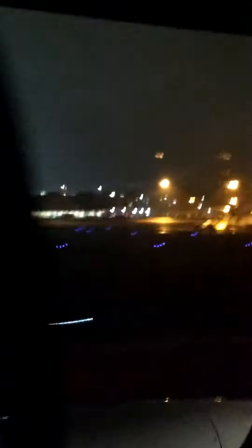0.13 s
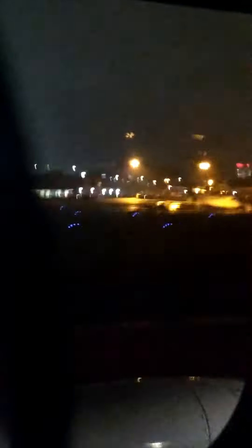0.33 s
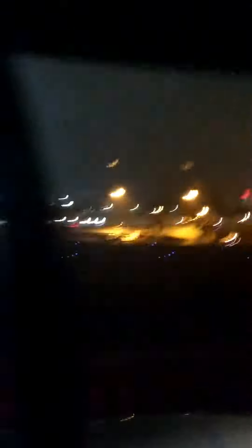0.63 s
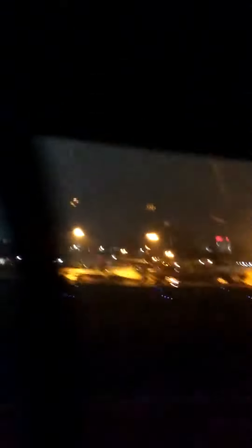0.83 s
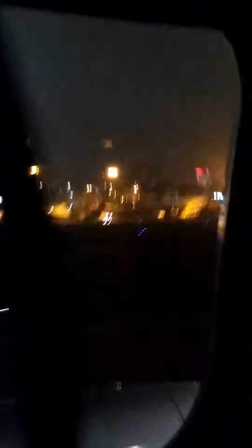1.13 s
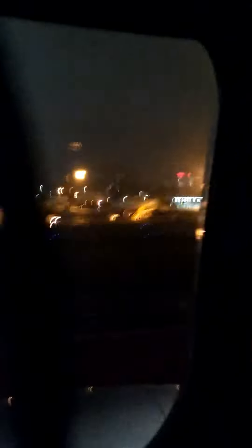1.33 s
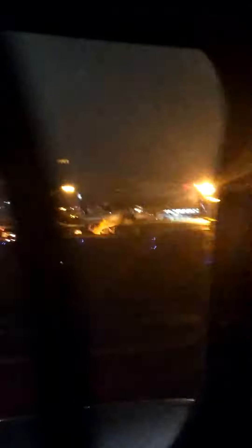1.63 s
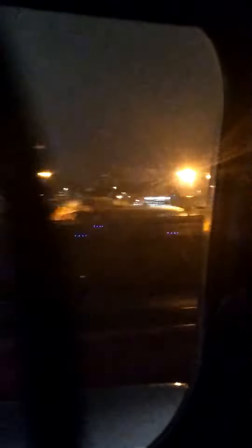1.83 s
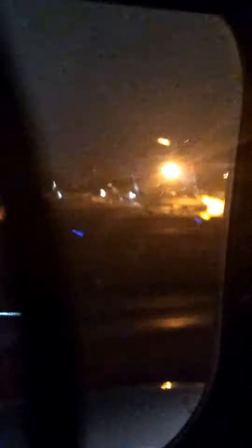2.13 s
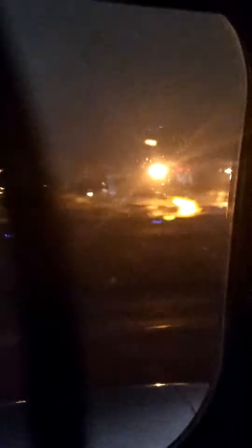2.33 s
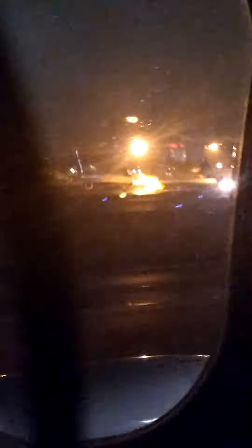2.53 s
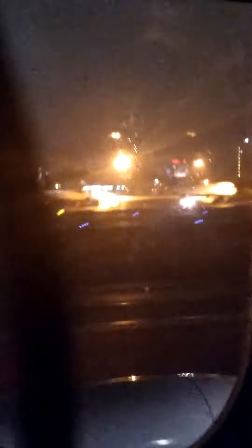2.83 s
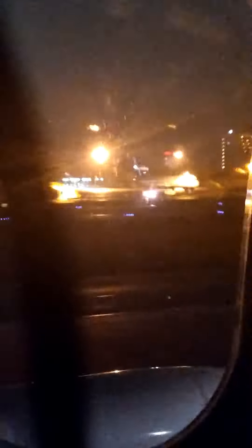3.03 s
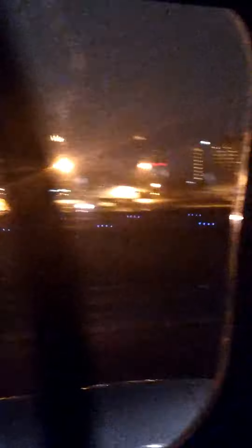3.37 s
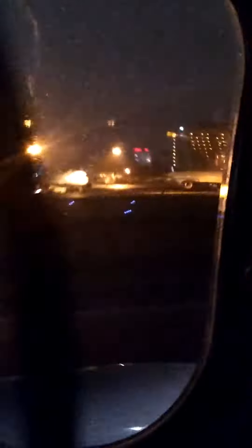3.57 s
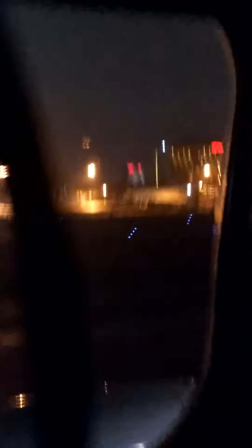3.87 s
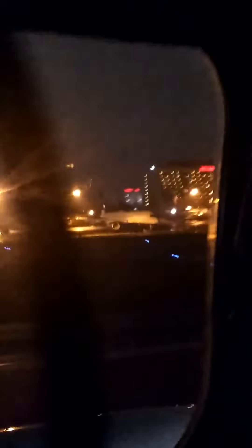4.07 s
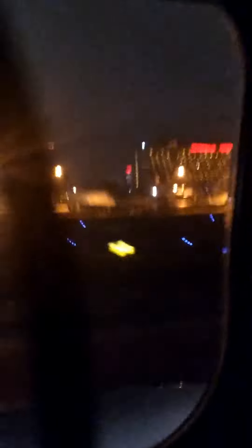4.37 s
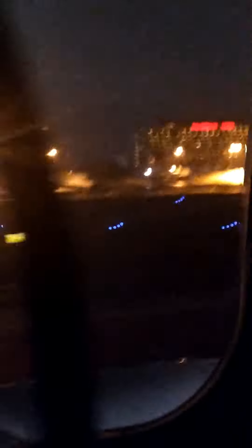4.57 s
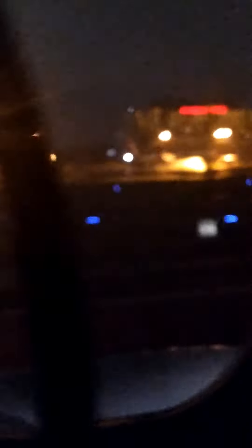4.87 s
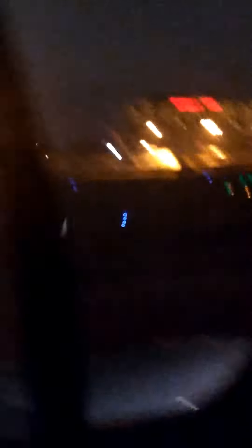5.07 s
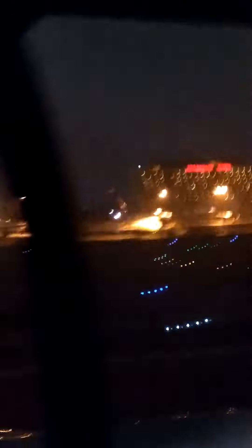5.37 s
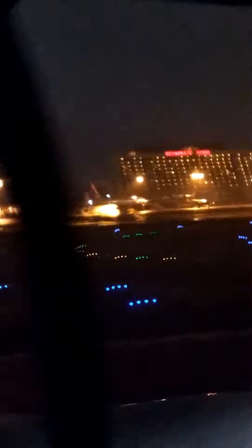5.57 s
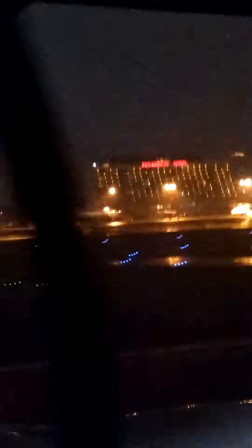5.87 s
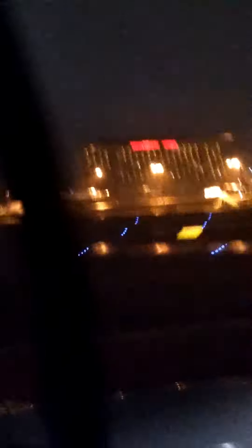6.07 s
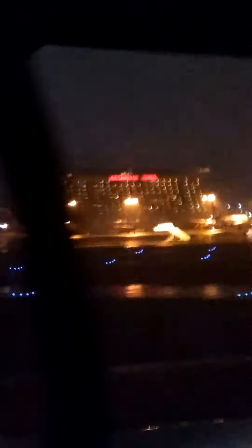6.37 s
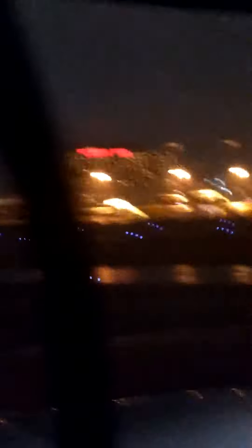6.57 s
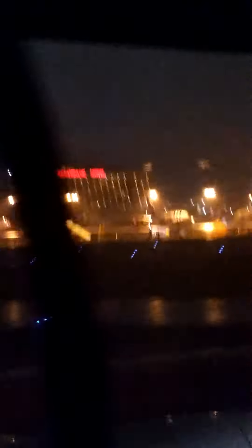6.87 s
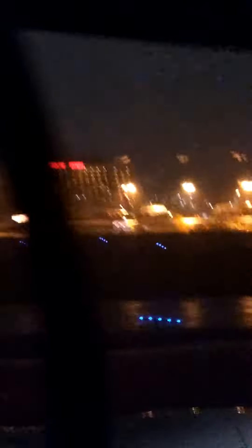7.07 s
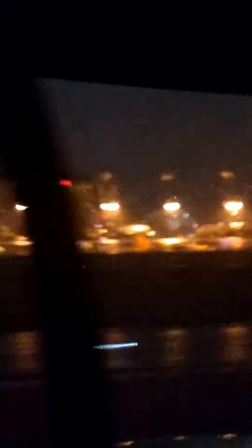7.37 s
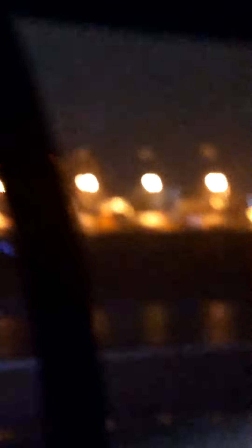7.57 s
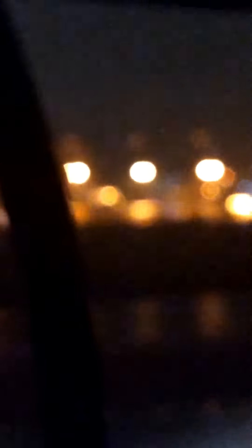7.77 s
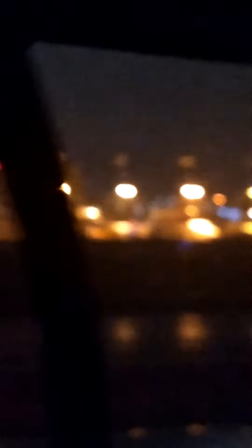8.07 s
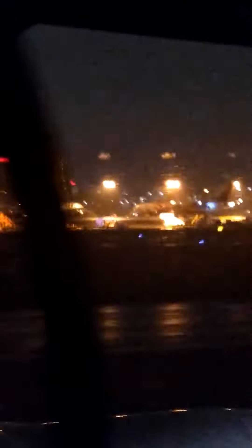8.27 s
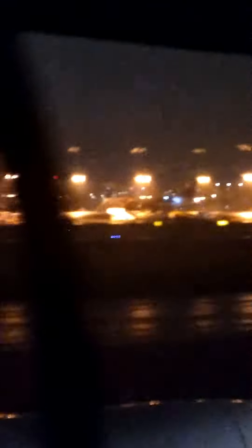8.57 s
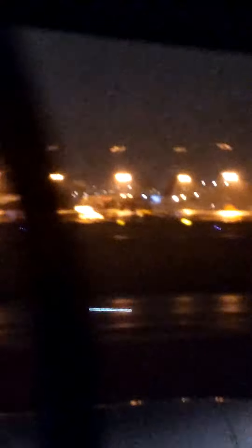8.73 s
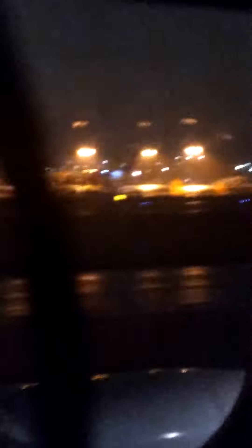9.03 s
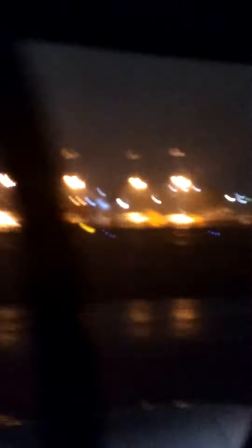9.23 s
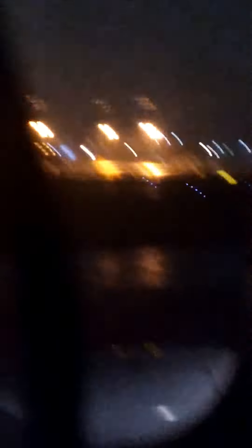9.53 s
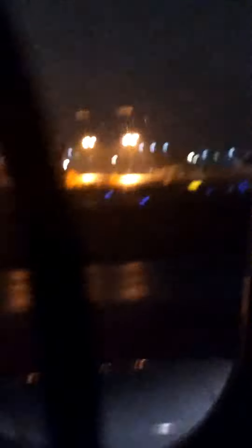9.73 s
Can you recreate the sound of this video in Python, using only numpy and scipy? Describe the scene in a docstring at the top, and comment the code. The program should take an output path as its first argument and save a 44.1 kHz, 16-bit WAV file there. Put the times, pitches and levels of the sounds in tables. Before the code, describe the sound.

From a window seat in an airliner cabin just after landing, low wheel rumble builds while the engines spool up with a faint rising whine. Around one to two seconds hard braking makes an even, booming judder, then a sharp rattle. Irregular deep thumps continue to about five seconds, then the rumble slowly eases under steady roar and soft seam thuds. The close handheld stereo microphone picks up heavy bass and thin hiss.

```python
"""In an airliner cabin, at a window seat, the roll-out after landing is heard.
Wheel rumble, shell drone and jolts are shaped noise; engine roar and reverser blast are turbulent noise.
Gliding sines make the fan whine and a thin whistle, filtered noise hisses from the vents,
and bursts of tiny contacts ring the loose fittings through their modes.
Now and then the roar, hiss, whines and ticking dip together briefly."""
import sys
import numpy as np
from scipy import signal
from scipy.fft import rfft, irfft
from scipy.io import wavfile
from scipy.ndimage import uniform_filter1d

SR = 44100
rng = np.random.default_rng(int(sys.argv[2]) if len(sys.argv) > 2 else 0)


def materialize(psi):
    """Save the field psi as 16-bit PCM at rate SR to the path in sys.argv[1].

    A 1-D psi becomes a single channel; in a 2-D psi each row is a channel.
    """
    bounded = np.clip(np.atleast_2d(psi).T, -1, 1)
    quanta = np.round(bounded * 32767).astype(np.int16)
    wavfile.write(sys.argv[1], SR, quanta)


N = 436590
TIME = np.arange(N) / SR
BINS = np.fft.rfftfreq(N, 1 / SR)

# strongest jolts of the fuselage, levels ahead of the panels' band-pass:
# start_s, length_s, level_db, left_over_right_db, pitch_hz, dip_db (brief dip of the other sounds)
JOLTS = [(.054, 0.053, -22, 1, 100, -1.5), (.147, 0.072, -18.5, -3, 80.5, 3),
         (.272, 0.017, -13.5, -2, 75.4, 2), (.519, 0.021, -19, 0, 92, 5), (.576, 0.051, -15.5, -1.5, 91, 2),
         (.88, 0.042, -20.5, 1, 99, 1), (.96, 0.02, -15, -1.5, 107, 3), (1.102, 0.079, -24, 4, 86, 3.5),
         (2.152, 0.098, -13, 6, 106, -1), (2.279, 0.12, -22.5, 4, 83, 7), (2.72, 0.13, -25, 9, 81, 4.5),
         (2.875, 0.077, -19.5, -2.5, 91, 5), (3.193, 0.066, -23.5, 1, 94, 8),
         (3.331, 0.034, -14.5, 8, 112, 7), (3.59, 0.045, -18, 13, 109, 3.5), (3.801, 0.15, -18, 1.5, 97, 3),
         (4.109, .14, -10.5, 2, 88, 11), (4.283, .036, -19.5, 2, 104, -3), (4.372, .11, -16.5, -2.5, 99, 7),
         (4.64, 0.061, -22.5, -1, 111, 8.5), (4.711, .1, -13.5, 4, 96, 7),
         (4.829, 0.061, -20.5, 4, 124, -2), (4.969, .052, -22, 1, 105, 0), (5.086, .045, -11, 0.5, 96, 7),
         (5.835, 0.046, -16.5, 0, 82, 7), (5.921, 0.13, -25.5, -3, 85.4, 2),
         (7.312, 0.035, -23.5, -2, 108, 15), (7.74, .058, -23.5, -2, 102, 10),
         (9.079, 0.057, -22.5, -4, 112, -2), (9.442, 0.059, -21.5, -4, 80, 8),
         (9.83, 0.045, -25, -1, 73, 8.5)]


def amp(db):
    """Decibels to amplitude ratio: 20 dB per factor of ten."""
    return 10 ** (np.asarray(db) / 20)


def unit(x):
    """Normalization to an rms of 1."""
    return x / np.sqrt(np.mean(x ** 2) + 1e-20)


def spectrum(points, hz):
    """Spectral interpolation of a table, linear along a log-frequency axis."""
    f, value = np.transpose(points)
    return np.interp(np.log(hz + 1e-6), np.log(f), value)


def curve(rows):
    """Linear interpolation in time of each column that follows the first."""
    s, *columns = np.transpose(rows)
    return [np.interp(TIME, s, column) for column in columns]


def add(mix, s, sound):
    """Superposition of a stereo sound on the mix, starting at s seconds."""
    part = mix[:, max(round(s * SR), 0):][:, :sound.shape[1]]
    part += sound[:, :part.shape[1]]


def wander(rate_hz):
    """Low-pass noise of rms 1: random fluctuation that weakens above rate_hz."""
    lowpass = 1 / (1 + (BINS / rate_hz) ** 2) ** 2
    return unit(irfft(rfft(rng.standard_normal(N)) * lowpass, N))


def cabin_noise(colour, pitch=1, size=N):
    """Diffuse-field coherence: both ports hear alike bass and nearly unrelated treble."""
    # likeness of the sound at the two ports: frequency_hz, coherence
    likeness = [(60, 1), (130, 0.86), (290, 0.85), (640, 0.24), (1400, -0.21), (3000, 0.062),
                (16000, -0.01)]
    hz = np.fft.rfftfreq(size, 1 / SR)
    a, b = rfft(rng.standard_normal((2, size)))
    same = np.clip(spectrum(likeness, hz), -1, 1)
    mid = a * np.sqrt(1 + same)
    side = b * np.sqrt(1 - same)
    gain = amp(spectrum(colour, hz / pitch))
    return unit(irfft(np.array([mid + side, mid - side]) * gain, size))


def steadied(x, span_s, evenness):
    """Envelope compression: swings of level are evened over span_s; evenness runs 0-1."""
    power = np.mean(abs(signal.hilbert(x)) ** 2, 0)
    power = uniform_filter1d(power, size=max(int(span_s * SR), 1))
    return unit(x / (abs(power) + 1e-9) ** (min(evenness, 1) / 2))


def patchy(x, patch_db, span_hz, span_s, size=1024):
    """Turbulent modulation: patches of the spectrum swell and sink at random."""
    overlap = size * 3 // 4
    z = signal.stft(x, nperseg=size, noverlap=overlap)[2]
    bins_wide = max(round(span_hz * size / SR), 1)
    frames_long = max(round(span_s * z.shape[2] * SR / N), 1)
    field = rng.standard_normal(z.shape[1:])
    field = uniform_filter1d(field, size=bins_wide, axis=0)
    field = uniform_filter1d(field, size=frames_long, axis=1)
    swollen = z * amp(patch_db * unit(field))
    return unit(signal.istft(swollen, nperseg=size, noverlap=overlap)[1][:, :N])


def slowing(x, sink_per_s=.01):
    """Time-scale warping: pitch sinks by a steady share each second as the aircraft loses speed."""
    place = np.cumsum(1 + sink_per_s * (TIME.mean() - TIME))
    return np.array([np.interp(place, np.arange(N), channel) for channel in x])


def fitting(drive, top_hz=12000, width_hz=80):
    """Modal resonance of a loose fitting under tapping; softer contacts reach less high."""
    # broad ringing of the fittings: frequency_hz, relative_density_db
    ringing = [(1500, -37), (4500, -17), (5600, -3.5), (7500, -2.5), (9000, -0.5), (11000, 1.5),
               (13000, -8), (16000, 5)]
    # sharpest modes of the fittings: frequency_hz, lift_db
    sharp_modes = [(5990, 8), (6300, -5), (7290, 12), (8100, 4), (8765, 8), (8990, 3.5), (9450, -1),
                   (10585, -13), (11490, 4), (12530, -2)]
    hz = np.fft.rfftfreq(drive.shape[1], 1 / SR)
    modes = 1 + sum((amp(db) - 1) / (1 + 2j * (hz - f) / width_hz) for f, db in sharp_modes)
    colour = amp(spectrum(ringing, hz)) / np.sqrt(1 + (hz / top_hz) ** 14)
    response = unit(abs(modes * colour)) * np.exp(1j * np.angle(modes))
    return irfft(rfft(drive) * response, drive.shape[1])


def vents(left_db=-51, right_db=-56.0):
    """Aerodynamic noise: turbulent cabin air hisses from the vents."""
    # colour of the hiss: frequency_hz, relative_density_db
    hiss = [(500, -18), (2500, -1.5), (5000, -2.5), (8500, 4), (12000, -1.5), (16000, -6)]
    return patchy(cabin_noise(hiss), patch_db=2.5, span_hz=500, span_s=.03) * amp([[left_db], [right_db]])


def ticking(level_db=-62, per_s=14, spread_db=4, ring_s=0.012):
    """Random impact excitation: shaking keeps the trim ticking, independently at each port."""
    struck = rng.random((2, N)) < per_s / SR
    taps = struck * amp(spread_db * np.minimum(rng.exponential(1, (2, N)), 2))
    decay = np.exp(-1 / (ring_s * SR))
    envelope = signal.lfilter([1], [1, -decay], taps + 1e-12)
    return amp(level_db) * unit(fitting(envelope * rng.standard_normal((2, N))))


def rattles(level_db=-5, chatter_db=4.0, rise=.0045, settle_db=-12.5, settle_s=0.28, size=16384):
    """Repeated impact: loose hard parts chatter in a quick cluster, then more weakly as they settle."""
    # rattles; level_db is added to each relative level:
    # start_s, relative_level_db, decay_t60_s, left_over_right_db, upper_edge_hz
    clusters = [(.617, -41, 0.28, 11, 8050), (2.049, -42, .18, 5, 7200), (2.074, -15, .066, 0, 13000),
                (2.207, -30.5, .21, 6, 10000), (2.558, -36.5, .065, -7, 13000),
                (3.157, -41, 0.041, 6, 12000), (4.158, -40, .03, -2, 11000), (4.283, -43, .04, -9, 14000),
                (5.764, -30.5, 0.14, 4, 12300), (7.058, -39.5, 0.21, -5, 8300),
                (8.881, -36, 0.029, -2, 18000), (9.297, -37.5, .09, 8, 8700), (9.398, -38, .052, 7, 13100)]
    out, t = np.zeros((2, N)), np.arange(size) / SR
    for s, db, t60, pan_db, top_hz in clusters:
        contacts = amp(chatter_db * unit(uniform_filter1d(rng.standard_normal(size), size=20)))
        fall_db = -60 * np.maximum(t - rise, 0)
        # the slower settling takes over once it is the stronger
        decay_db = np.maximum(fall_db / t60, settle_db + fall_db / settle_s)
        envelope = np.minimum(t / rise, 1) * amp(decay_db)
        chatter = unit(contacts * rng.standard_normal((2, size))) * envelope
        gain = amp(db + level_db + np.array([[pan_db], [-pan_db]]) / 2)
        add(out, s, fitting(chatter, top_hz) * gain)
    return out


def tone(rows, waver=.003, waver_hz=40, flutter_db=2, flutter_hz=12):
    """Phase integration of a sine whose pitch and level waver; it is silent outside its rows."""
    hz, db = curve(rows)
    turns = np.cumsum(hz * (1 + waver * wander(waver_hz))) / SR
    level = np.sqrt(2) * amp(db + flutter_db * wander(flutter_hz))
    sounding = (TIME >= rows[0][0]) * (TIME <= rows[-1][0])
    return level * np.sin(2 * np.pi * turns) * sounding


def whines(fan_trim_db=-3.0):
    """Blade-passing tones: the fan whines up with engine speed, and a thin whistle joins at full thrust."""
    # fan whine during spool-up, before the trim: time_s, pitch_hz, relative_level_db
    fan = [(0, 452, -51), (.55, 469, -53), (1.25, 482.5, -53.5), (1.7, 490, -75)]
    # whistle under full thrust: time_s, pitch_hz, level_db
    whistle = [(.95, 7420, -74), (1.45, 7400, -61), (1.98, 7440, -65), (2.15, 7480, -76)]
    return tone(fan, waver=.005, waver_hz=30) * amp(fan_trim_db) + tone(whistle, waver=0.0025, waver_hz=150)


def engines(gusty_db=1.1, left_db=1, direct_db=-8, lag_s=.00048, buffet_db=2):
    """Jet mixing noise: the roar flutters with turbulence and the reversers' blast buffets."""
    # colours of roar (engines and outside air) and blast: frequency_hz, relative_density_db
    roar_colour = [(100, -11), (300, 4), (500, -1), (800, -2.5), (1150, -7.5), (1450, -5.5), (2100, -12.5),
                   (3000, -15), (4500, -22), (8000, -23), (16000, -31)]
    blast_colour = [(200, -12), (380, 3), (470, -1), (620, -1.5), (850, -0.5), (1100, -7.5), (1400, -9.5),
                    (2500, -20), (6000, -59)]
    # strength of the reversers' blast: time_s, level_db
    reverse = [(.6, -72), (1.2, -45), (1.85, -43.5), (2.3, -50), (2.7, -40.5), (3.1, -52), (9.9, -60)]
    # the engines spool up from idle, then their roar eases very slowly
    spool_s, idle_db, full_db, ease_db_per_s = 1.7, -47, -39, 0.09
    level_db = np.interp(TIME, [0, spool_s], [idle_db, full_db])
    level_db -= ease_db_per_s * np.maximum(TIME - spool_s, 0)
    blast_db, = curve(reverse)
    # part of the roar comes straight from the window and reaches the left port first
    direct = cabin_noise(roar_colour)[0]
    arrivals = np.array([direct, np.roll(direct, round(lag_s * SR))])
    roar = cabin_noise(roar_colour) + amp(direct_db) * arrivals
    roar = patchy(roar, patch_db=1.55, span_hz=170, span_s=.09) * amp(level_db + gusty_db * wander(19))
    blast = cabin_noise(blast_colour) * amp(blast_db + buffet_db * wander(25))
    return (roar + blast) * amp([[left_db / 2], [-left_db / 2]])


def level_dips(sway_hz=95, sway=0.69, deepest_db=7.0, onset=1.0, delay_s=0.017, width_s=0.012):
    """Amplitude modulation: brief dips just after some jolts begin, and at random between them."""
    # a negative dip_db by itself gives no dip
    jolt_dip_db = sum(db * np.exp(-((TIME - s - delay_s) / width_s) ** 2) for s, *_, db in JOLTS)
    push = sway * wander(sway_hz) * np.minimum(TIME / onset, 1)
    random_dip_db = deepest_db * np.tanh(push ** 2 / 2)
    return amp(-np.maximum(jolt_dip_db, random_dip_db))


def wheels(lumpy_db=1.4, lumps_hz=11):
    """Structure-borne sound: tyres rumble on uneven concrete and shake the shell into a lumpy drone."""
    # colours of the wheel rumble and the shell's drone: frequency_hz, relative_density_db
    rumble_colour = [(10, -28), (26, -25), (56, -1), (74, -4), (96, 1), (125, -8), (230, -18.5), (600, -57),
                     (2000, -90)]
    shell_colour = [(40, -40), (130, -4.5), (190, -2), (245, 0), (320, -6.5), (430, -16), (800, -31),
                    (2000, -68)]
    # strength of the shell's drone: time_s, level_db
    drone_level = [(0, -47), (.7, -37.5), (1.5, -35), (1.8, -26), (2.5, -33.5), (3.3, -31.5), (9.9, -32.5)]
    # the rumble builds as the brakes bite, then eases with the speed
    brakes_s, peak_db, rise_db_per_s, ease_db_per_s = 1.9, -26, 3.5, 0.41
    wheel_db = peak_db - np.maximum(rise_db_per_s * (brakes_s - TIME), ease_db_per_s * (TIME - brakes_s))
    shell_db, = curve(drone_level)
    rumble = steadied(cabin_noise(rumble_colour), span_s=0.066, evenness=0.17)
    rumble = rumble * amp(wheel_db + lumpy_db * wander(lumps_hz))
    drone = patchy(slowing(cabin_noise(shell_colour)), patch_db=3.5, span_hz=130, span_s=0.046)
    drone = steadied(drone, span_s=0.41, evenness=0.82) * amp(shell_db)
    return rumble + drone


def boom(s, length, db, pan_db, hz, edge=0.01576, evenness=.55, size=16384):
    """Forced panel vibration: one jolt sets panels booming about equally hard while it lasts."""
    # colour of a jolt: multiple_of_pitch, relative_density_db
    jolt_colour = [(.12, -30), (.3, -35), (.55, -1), (1, 8), (1.4, -6), (2.3, -15.5), (4, -31), (8, -22),
                   (16, -48)]
    t = np.arange(size) / SR
    gate = np.sin(np.pi / 2 * np.clip(np.minimum(t, length + edge - t) / edge, 0, 1)) ** 2
    swing = steadied(cabin_noise(jolt_colour, hz, size=size), span_s=0.029, evenness=evenness) * gate
    swing = unit(swing * amp([[pan_db / 2], [-pan_db / 2]]))
    # the level holds over the jolt's length, not over the whole buffer
    return s - edge / 2, swing * np.sqrt(length * SR / size) * amp(db)


def judder(scatter=0.08, count=7):
    """Periodic excitation under hard braking: an even train that weakens, deepens and drifts left."""
    start_s, every_s, length_s, pitch_hz = 1.277, .119, .1, 100
    first_db, fade_db_per_s, drift_db_per_s, sag_hz_per_s = -11, 1.4, 8, 16
    train = []
    for t in every_s * np.arange(count):
        hz = (pitch_hz - sag_hz_per_s * t) * np.exp(scatter * rng.standard_normal())
        train.append((start_s + t, length_s, first_db - fade_db_per_s * t, drift_db_per_s * t, hz))
    return train


def jolts(lowest_hz=29, highest_hz=270):
    """Band-limited panel radiation: deep booms from judder and jolts, higher thuds from seams."""
    # wheels on runway seams once the aircraft has slowed, levels before the band-pass: start_s, level_db
    seams = [(5.355, -27), (5.766, -27.5), (6.115, -25), (6.249, -27.5), (6.73, -21.5), (7.215, -19.5),
             (8.015, -29), (8.17, -26.5), (8.56, -23), (9.509, -22.5)]
    thud_hz, sag_hz_per_s, thud_length_s, thud_left_over_right_db = 212, 7, .04, -2
    thuds = []
    for s, db in seams:
        hz = thud_hz - sag_hz_per_s * (s - seams[0][0])
        thuds.append((s, thud_length_s, db, thud_left_over_right_db, hz))
    out = np.zeros((2, N))
    for s, length, db, pan_db, hz, *_ in [*judder(), *JOLTS, *thuds]:
        add(out, *boom(s, length, db, pan_db, hz))
    # panels radiate little below their lowest mode, and the lining muffles the top
    band = signal.butter(2, [lowest_hz, highest_hz], "bandpass", fs=SR, output="sos")
    return signal.sosfilt(band, out)


def scene():
    """Linear superposition of all sources at the seat; the dips spare wheels, jolts and rattles."""
    dipping = vents() + ticking() + whines() + engines()
    return rattles() + dipping * level_dips() + wheels() + jolts()


def record(dry, edge_hz=15850):
    """Port resonance, saturation and band limit: treble rings, loud peaks are rounded."""
    # microphone ports, left then right: resonance_hz, width_hz, lift_db
    ports = [(8300, 1030, 8.5), (9130, 790, 12.5)]
    lift = []
    for hz, width, db in ports:
        falloff = np.sqrt(1 + (2 * (BINS - hz) / width) ** 2) ** 1.58
        lift.append(1 + (amp(db) - 1) / falloff)
    sound = np.tanh(irfft(rfft(dry) * np.array(lift), N))
    lowpass = signal.firwin(511, edge_hz, window=("kaiser", 9), fs=SR)
    return signal.oaconvolve(sound, lowpass[None], "same")


dry = scene()
out = record(dry)
materialize(out)
```